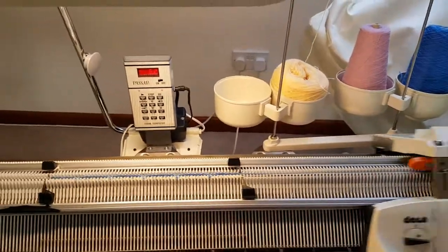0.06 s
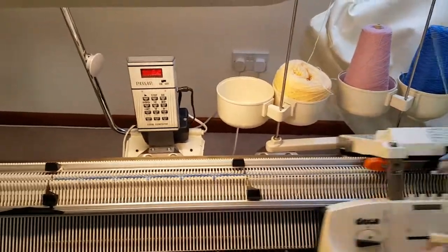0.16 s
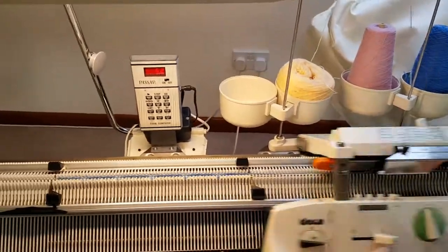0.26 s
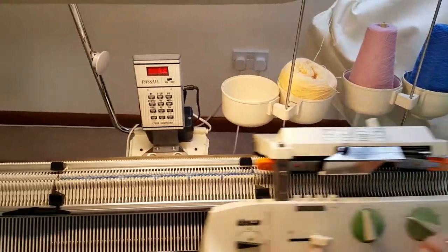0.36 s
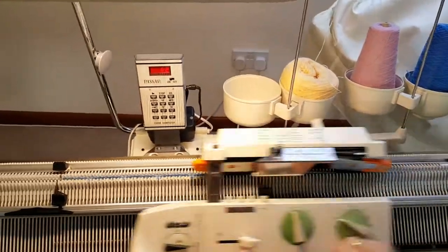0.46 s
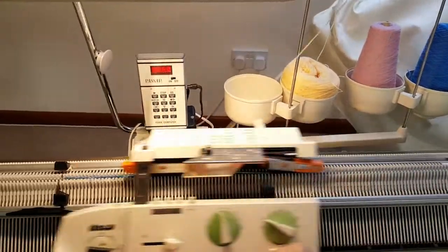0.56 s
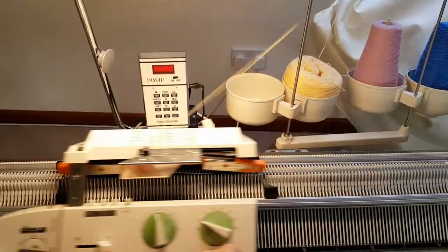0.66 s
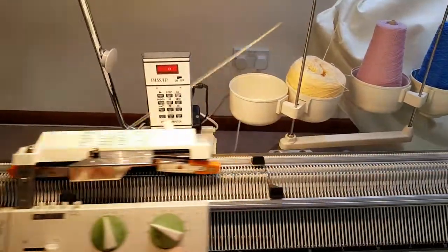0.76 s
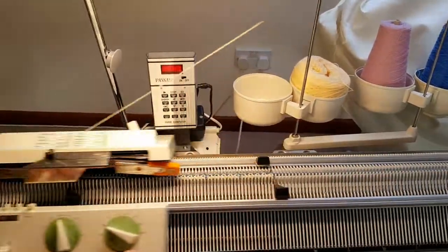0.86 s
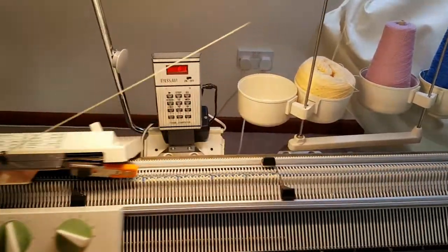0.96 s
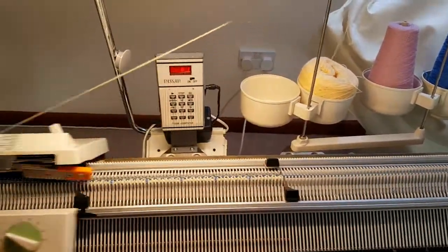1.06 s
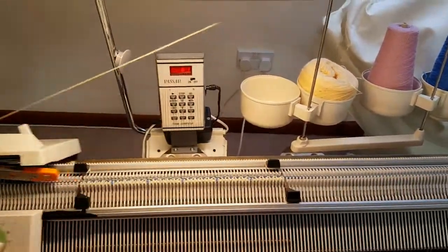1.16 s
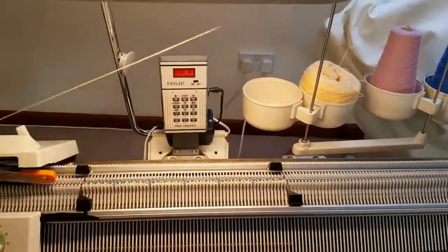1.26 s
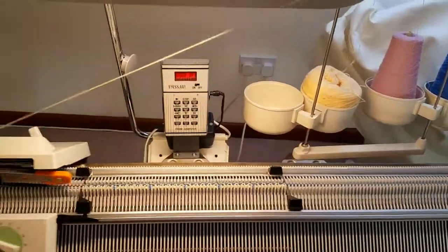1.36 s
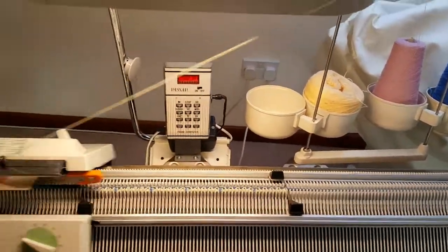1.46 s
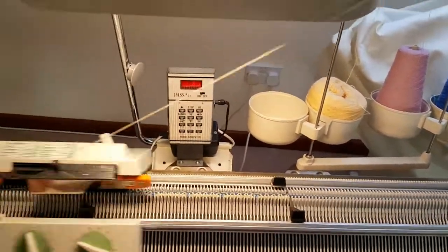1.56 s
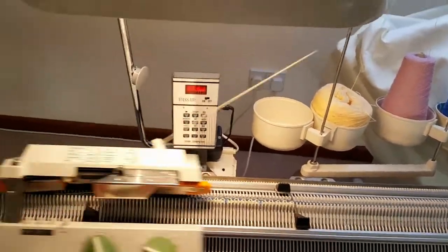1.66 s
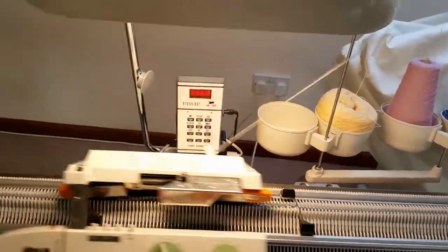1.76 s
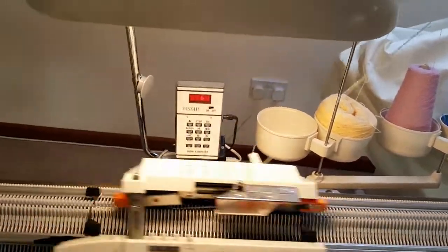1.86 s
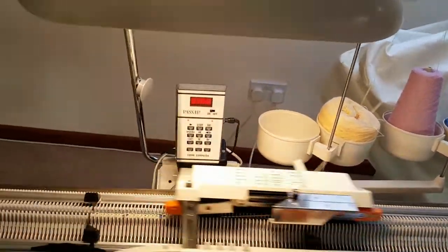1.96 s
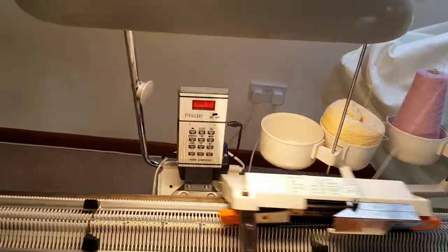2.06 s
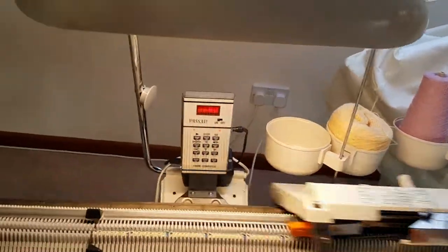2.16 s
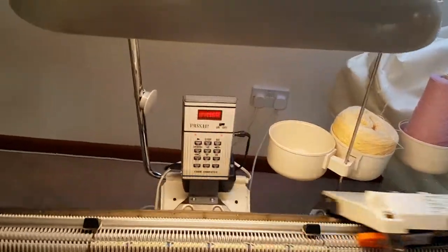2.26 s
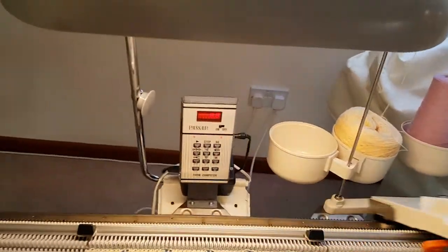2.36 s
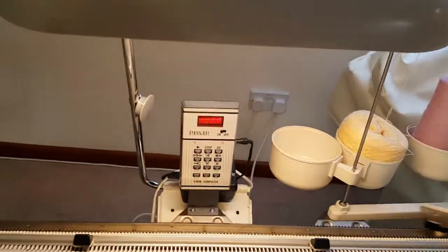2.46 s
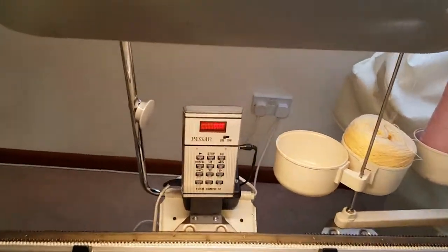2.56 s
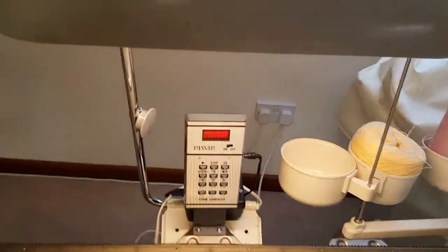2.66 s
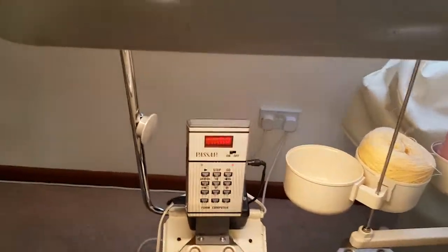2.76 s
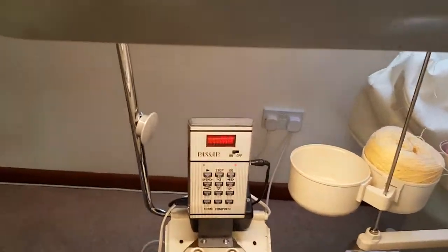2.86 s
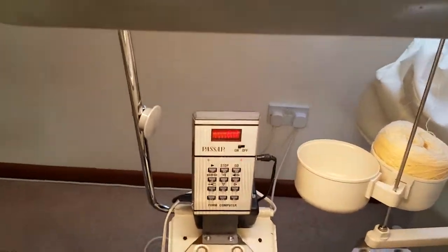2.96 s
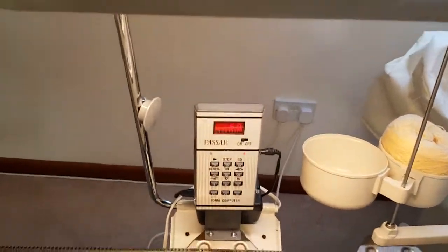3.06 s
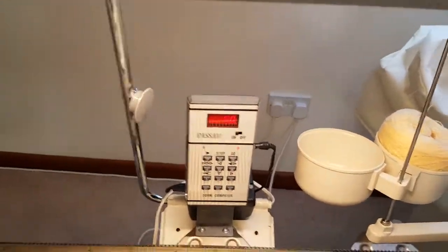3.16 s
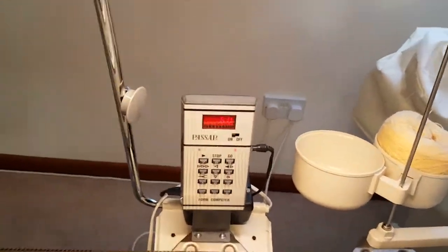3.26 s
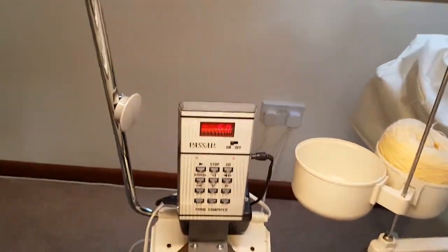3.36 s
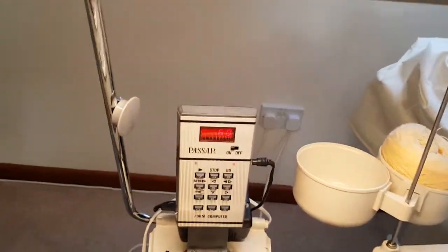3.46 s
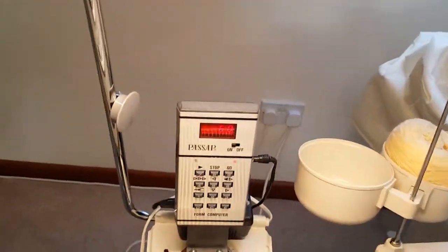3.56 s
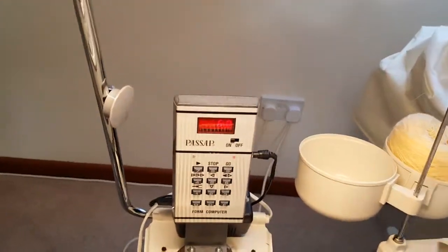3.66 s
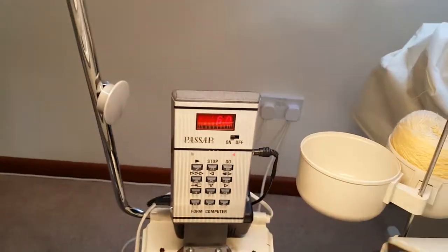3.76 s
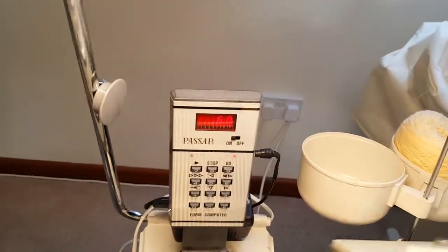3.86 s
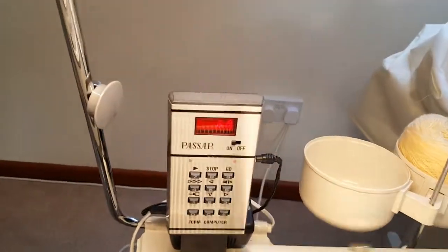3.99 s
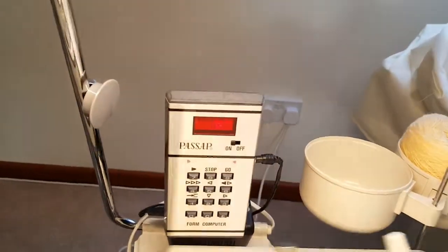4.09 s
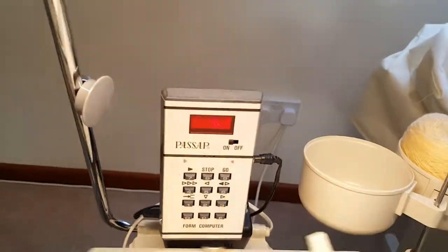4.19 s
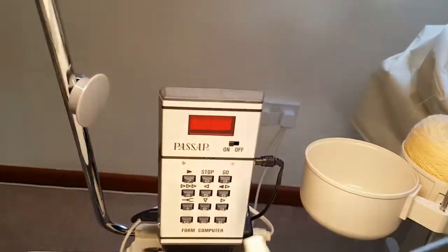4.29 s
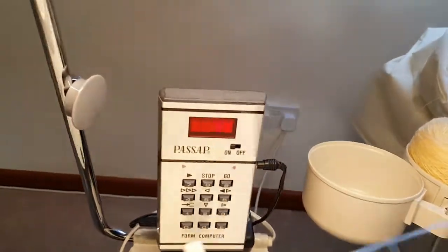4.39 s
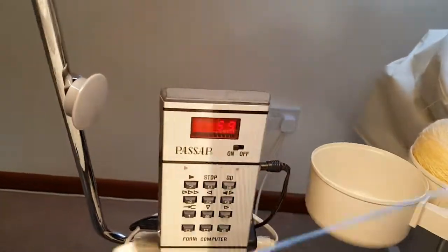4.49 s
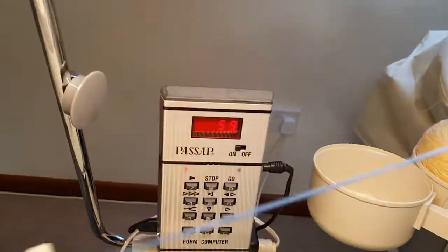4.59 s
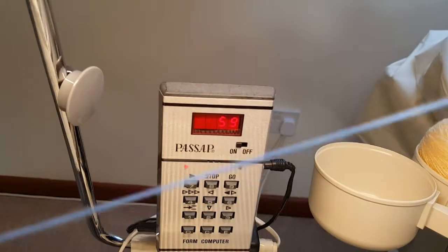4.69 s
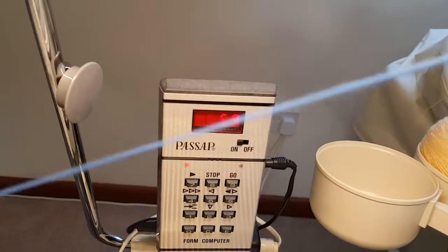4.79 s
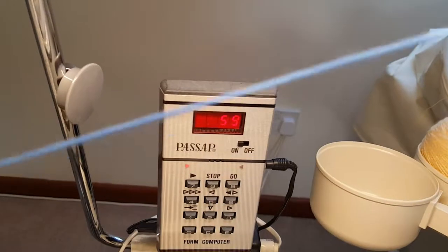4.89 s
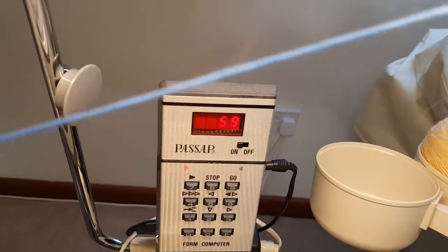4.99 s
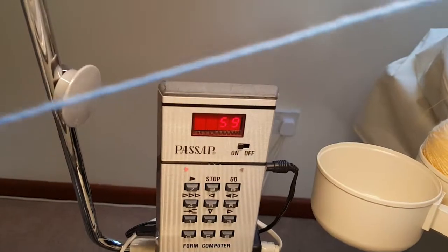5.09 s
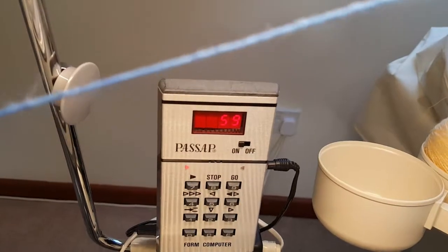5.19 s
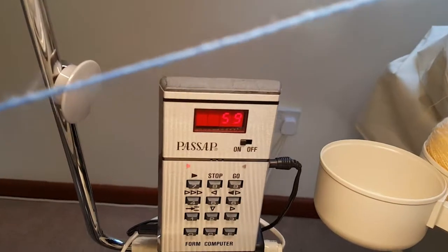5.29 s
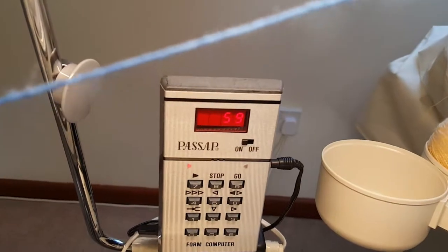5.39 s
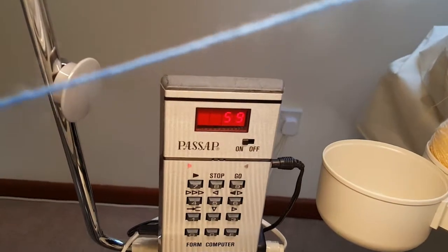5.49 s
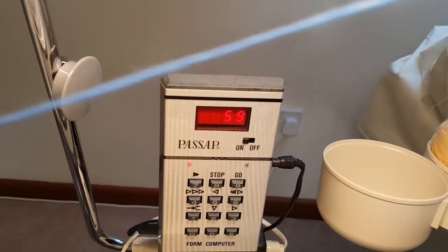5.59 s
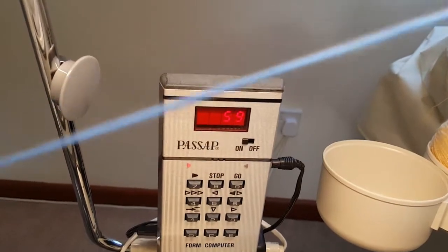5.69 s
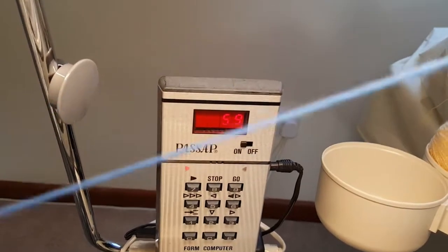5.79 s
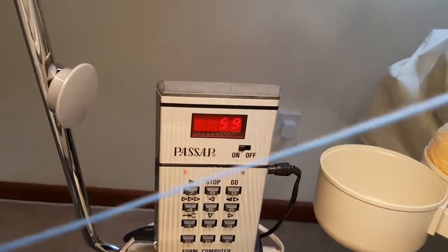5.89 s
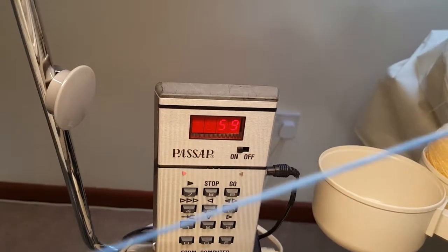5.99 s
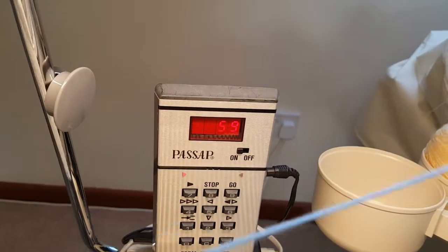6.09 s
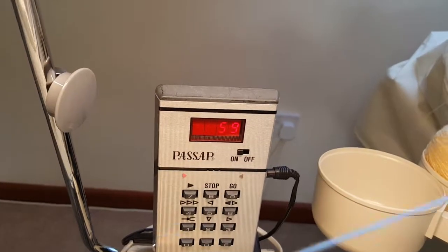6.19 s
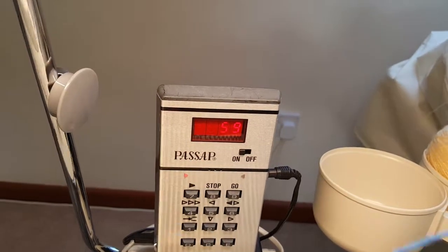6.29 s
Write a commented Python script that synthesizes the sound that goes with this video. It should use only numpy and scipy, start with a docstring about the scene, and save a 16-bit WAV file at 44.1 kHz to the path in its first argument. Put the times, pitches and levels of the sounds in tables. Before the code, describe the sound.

In a quiet indoor room, a hand knitting machine carriage starts with sharp clacks, then sweeps along its steel needle bed with a dense, buzzing rattle and hollow drone. It clunks at the end, sweeps back louder, pauses amid knocks and jerky shoves, makes a third pass, then settles with light clicks and faint squeaks. A close stereo microphone catches short room echoes.

```python
"""Knitting machine carriage, close by

A hand pushes a knitting machine carriage to and fro along its steel needle beds in a quiet room.
Needle ticks rattle the steel and like ticks at the same pace drone in the carriage shell; clacks
crack and chatter, bumps and knocks ring as short tones, and faint squeaks waver while it rests.
A small two-port microphone close by hears it all with short echoes, over the hush of the room."""
import sys
import numpy as np
from scipy import signal
from scipy.io import wavfile
from scipy.ndimage import uniform_filter1d

SR = 44100
rng = np.random.default_rng(int(sys.argv[2]) if len(sys.argv) > 2 else 0)


def store_pcm(level_fs):
    """Save levels as 16-bit WAV."""
    pcm = np.round(np.clip(level_fs, -1, 1) * 32767).astype(np.int16)
    wavfile.write(sys.argv[1], SR, np.atleast_2d(pcm).T)


N = 279594
T = np.arange(N) / SR


def gain_of(db):
    """Decibels to amplitude gain."""
    return 10 ** (np.asarray(db) / 20)


def evened(x):
    """Scales a signal to rms 1."""
    return x / np.sqrt(np.mean(x ** 2) + 1e-20)


def read(points, hz):
    """Reads a (pitch_hz, value) table along log frequency."""
    f, value = np.transpose(points)
    return np.interp(np.log(hz + 1), np.log(f + 1), value)


def coloured(x, shape, modes=()):
    """Minimum-phase filter of unit energy: a spectrum with resonance peaks on it."""
    hz = abs(np.fft.fftfreq(2 ** 13, 1 / SR))
    db = read(shape, hz)
    for mode_hz, width_hz, peak_db in modes:
        db = db + peak_db / (1 + (2 * (hz - mode_hz) / width_hz) ** 2)
    log_gain = np.log(gain_of(np.maximum(db, -90)))
    # the Hilbert transform of the log gain gives the phase that makes the filter causal
    taps = np.fft.ifft(np.exp(np.conj(signal.hilbert(log_gain)))).real[:2 ** 12]
    return signal.oaconvolve(x, taps / np.linalg.norm(taps))[:len(x)]


def tilted(x, bright_db, split_hz=6000):
    """Raises what lies above the split by bright_db."""
    low = signal.sosfilt(signal.butter(3, split_hz, "low", fs=SR, output="sos"), x)
    high = signal.sosfilt(signal.butter(3, split_hz, "high", fs=SR, output="sos"), x)
    return low + gain_of(bright_db) * high


def resonate(x, hz, width_hz):
    """A resonance of gain 1: shifts hz down to zero, smooths, and shifts back."""
    turn = np.exp(2j * np.pi * np.cumsum(hz * np.ones(len(x))) / SR)
    r = np.exp(-np.pi * width_hz / SR)
    smooth = signal.lfilter([1 - r], [1, -r], x / turn)
    return 2 * (turn * smooth).real


def drifting(x, spin, patchy_db, bins=5, frames=8):
    """Short-time spectra turned and shaded at random, as the paths change while things move."""
    z = signal.stft(x, nperseg=256, noverlap=192)[2]
    turn, shade = rng.standard_normal((2,) + z.shape)
    turn = evened(uniform_filter1d(uniform_filter1d(turn, size=2, axis=0), size=frames, axis=1))
    shade = evened(uniform_filter1d(uniform_filter1d(shade, size=bins, axis=0), size=5 * frames, axis=1))
    changed = z * np.exp(1j * spin * turn) * gain_of(patchy_db * shade)
    out = signal.istft(changed, nperseg=256, noverlap=192)[1][:N]
    return out * np.linalg.norm(x) / np.linalg.norm(out)


# where the carriage stands before the two ports: start_s, left_minus_right_db, left_lag_ms
PLACE = [(0, -6, 0.47), (.45, -5, 0.16), (1.25, -6, -0.08), (2.25, -5.5, 0.15), (2.6, -5.5, 0.3),
         (3.25, -6, 0.48), (4.15, -5, 0.19), (4.75, -3.5, 0.012), (5.75, -4.5, -0.16), (6.34, -3.5, -0.17)]
# how much louder the left port hears each pitch: pitch_hz, left_minus_right_db
LEAN = [(60, 2), (120, 5), (240, 2.5), (480, 4), (950, 3), (1890, 2.5), (3770, -1.5), (7520, 3.5),
        (15000, 5)]
# how far the left port leads in phase: pitch_hz, left_lead_rad
LEAD = [(10, 0), (60, .6), (860, .55), (1700, .5), (3500, 1.2), (6000, .2), (15000, 0)]
# scattered sound that differs between the ports: pitch_hz, level_db
SIDEWAYS = [(60, -10), (250, -9), (600, -12), (1200, -4.5), (2500, -2), (5000, -1), (9000, -4), (15000, -6)]


def ports(middle, scattered):
    """Two ports hear the source with unlike level and timing; scattered sound enters them opposed."""
    hz, t, (middle, scattered) = signal.stft([middle, scattered], SR, nperseg=512)
    start_s, pan_db, lag_ms = np.transpose(PLACE)
    lean = gain_of((read(LEAN, hz)[:, None] + np.interp(t, start_s, pan_db)) / 2)
    lagging_hz = hz * np.exp(-(hz / 3000) ** 2)  # the treble arrives by many paths
    lag = 2 * np.pi * np.outer(lagging_hz, np.interp(t, start_s, lag_ms) / 1000)
    lean = lean * np.exp(.5j * (read(LEAD, hz)[:, None] - lag))  # each port takes half the difference
    side = gain_of(read(SIDEWAYS, hz))[:, None] * scattered
    return signal.istft([(middle + side) * lean, (middle - side) / lean], SR, nperseg=512)[1][:, :N]


# spectrum of the quiet room: pitch_hz, relative_db (per Hz)
ROOM_SPECTRUM = [(12, -13.5), (20, -4), (206, -4), (332, -2), (393, -6.5), (1790, -14.5), (2370, -16),
                 (12800, -50)]


def room_hush():
    """Steady coloured noise, drawn apart for the shared and the scattered sound at the ports."""
    hush_db = -53
    noises = rng.standard_normal((2, N))
    return ports(*[gain_of(hush_db) * evened(coloured(v, ROOM_SPECTRUM)) for v in noises])


def ticks(needles_per_s, per_s, spread_db, t60_s, pulse, count=10):
    """Random ticks of uneven size, crowding where each needle meets the cam."""
    clear_needles_per_s = 90  # below this speed the needles lose their even beat
    phase = np.cumsum(needles_per_s) / SR % 1
    beat = np.clip(pulse * np.minimum(needles_per_s / clear_needles_per_s, 1) ** 2, 0, 1)
    crowd = 1 - beat * (1 - 4 * np.exp(-4 * phase))
    size = gain_of(spread_db * np.minimum(rng.exponential(1, N), 5))
    size = size * (rng.random(N) < per_s * crowd / SR)
    # every tick takes one of a few dying noise bursts
    kind, t = rng.integers(0, count, N), T[:1024]
    bursts = rng.standard_normal((count, len(t))) * gain_of(-60 * t / t60_s)
    return evened(sum(signal.oaconvolve(size * (kind == k), bursts[k])[:N] for k in range(count)))


# resonances of the carriage shell: pitch_hz, width_hz, level_db
SHELL_MODES = [(670, 45, -5), (346, 29, -14.5), (196, 37, -26), (1115, 24, -6.5), (1250, 49, -7),
               (1360, 310, 2), (495, 240, -12.5), (1660, 530, -1.5)]


def ringing(x):
    """The shell's modes, rung by x, each wandering slowly at random in strength and pitch."""
    wander_s, wander_db, wander_share = .18, 4, .012  # knot spacing, level and pitch spread
    knots = np.arange(0, len(x) / SR + wander_s, wander_s)
    t, out = np.arange(len(x)) / SR, np.zeros(len(x))
    for hz, width_hz, db in SHELL_MODES:
        swell, bend = rng.standard_normal((2, len(knots)))
        mode_hz = hz * (1 + wander_share * np.interp(t, knots, bend))
        gain = gain_of(db + wander_db * np.interp(t, knots, swell)) * np.sqrt(SR / width_hz)
        out += gain * resonate(x, mode_hz, width_hz)
    return out


# the three full passes over the needles, each a list of points: start_s, shell_drone_db,
# needle_rattle_db, drone_hz (centre), bright_db (rattle above 6 kHz), ring_db (shell modes)
PASSES = [
    [(.38, -45, -56, 990, 34, 7), (.415, -46.5, -40, 960, 10.5, 9), (.44, -21.5, -32.5, 1350, -3.5, -9),
     (.48, -26, -25, 1330, 2.5, -2.5), (.74, -24.5, -21.5, 1295, 3, -1), (.95, -25, -27, 1050, 3, 0.5),
     (1.11, -26.5, -31, 991.4, -6, -0.5), (1.23, -37.5, -34, 694, -1, 8.5), (1.27, -32, -42, 680, -14, -9),
     (1.45, -67, -65, 700, -3, -15)],
    [(1.66, -38.5, -37, 850, -0.5, 8), (1.73, -29.5, -23.5, 1100, 4.5, 6), (1.85, -26, -22, 1080, 3, 5),
     (1.92, -23.5, -20.5, 1260, 3, 2.5), (2.1, -20.5, -23, 1160, 1, -7.5),
     (2.28, -19.5, -26.5, 830, -3, 1.5), (2.37, -25.5, -23, 847, -0.5, 0.5),
     (2.42, -35.5, -34.5, 840, 1, 9.5), (2.46, -27, -49, 804, -14, 0)],
    [(3.99, -38.5, -39, 1230, -12, -4.5), (4.02, -27, -30.5, 1260, -0.5, 1),
     (4.22, -22.5, -20, 1090, 3.5, 0), (4.31, -18.5, -22, 1135, 2, -2.5),
     (4.5, -23.5, -29.5, 1160, -2, -1.5), (4.54, -27, -31.5, 1020, 1.5, -3.5),
     (4.75, -28.5, -36.5, 854, 0, -0.5), (4.92, -37, -38.5, 677, -9.5, 3),
     (5.0, -44.5, -46, 680, -5.5, -8.5), (5.1, -51, -62, 680, 0, 1.5)],
]
# short shoves and creeps of the carriage: start_s, length_s, shell_db, rattle_db,
# swell_db (over the length), drone_hz (centre), bright_db (rattle above 6 kHz), ring_db (shell modes)
SHOVES = [(-.03, 0.11, -25, -30, 2.5, 1200, -8, -7.5), (0.098, 0.11, -26, -32, -2.5, 890, -1, -4),
          (0.25, 0.082, -26, -29, -3, 1500, -3.5, -6), (1.445, 0.18, -54.5, -56, 23, 800, -4, -9.5),
          (2.447, 0.056, -21.5, -32, -2, 890, -2, -0.5), (2.578, 0.07, -28.5, -41.5, -8, 829, -4, -7),
          (2.687, 0.064, -35.5, -45, -2, 890, -3, -1), (2.795, .04, -30.5, -45, -3, 700, -6, -2.5),
          (2.871, .11, -30.5, -42, -4, 870, -5, 0), (3.008, 0.099, -23, -27.5, -2.5, 1080, -9, -37),
          (3.298, 0.075, -22.5, -24.5, -5, 1130, -11, -8.5), (3.4, 0.11, -25.5, -33, -2.5, 1200, -10, -0.5),
          (3.543, 0.19, -31.5, -31, 5, 990.3, -0.5, -3.5), (3.803, .15, -35, -40.5, 14, 1250, -4.5, -20),
          (5.077, 0.22, -46, -50, -15, 910, -2, -3.5), (5.58, 0.35, -56, -62, 7.5, 895, -9.5, -8.5),
          (5.899, 0.24, -44, -49.5, -5, 830, -7.5, -11), (6.122, 0.2, -49.5, -47, 18, 895, -9, 0)]


def motion():
    """Adds the power of all movements; drone pitch, brightness and ring are averaged over them, weighted by
    shell power."""
    rise_s, fall_db_per_s = .025, 260  # how a shove sets in and dies
    rest_shell_db, rest_rattle_db = -72, -63  # the hand never holds the carriage quite still
    moves = []
    for points in PASSES:
        s, shell_db, steel_db, *tone = np.transpose(points)
        on = (T >= s[0]) & (T < s[-1])
        levels = [on * gain_of(np.interp(T, s, db)) for db in (shell_db, steel_db)]
        moves.append(levels + [np.interp(T, s, c) for c in tone])
    for start_s, length_s, shell_db, steel_db, swell_db, *tone in SHOVES:
        u = T - start_s
        push_db = swell_db * np.clip(u / length_s, 0, 1) - fall_db_per_s * np.maximum(u - length_s, 0)
        push = np.clip(u / rise_s, 0, 1) * gain_of(push_db)
        levels = [push * gain_of(shell_db), push * gain_of(steel_db)]
        moves.append(levels + [np.full(N, c) for c in tone])
    shell, steel, *tone = np.transpose(moves, (1, 0, 2))
    share = shell ** 2 + 1e-12  # each movement's tone counts by its shell power
    shell_gain = np.linalg.norm(shell, axis=0) + gain_of(rest_shell_db)
    steel_gain = np.linalg.norm(steel, axis=0) + gain_of(rest_rattle_db)
    return shell_gain, steel_gain, *(share * tone).sum(axis=1) / share.sum(axis=0)


# spectrum of the carriage shell: pitch_hz, relative_db (per Hz)
SHELL_SPECTRUM = [(40, -50), (120, -12.5), (250, -15), (400, -4.5), (650, -4.5), (900, 0), (1400, -3),
                  (2000, -13), (3000, -31.5), (5000, -39.5)]
# the shell's strongest mode comes, goes and bends over time:
# start_s, pitch_hz, level_db (over the drone)
MAIN_MODE = [(.2, 875, -45), (.3, 856, 1), (.76, 878, 0), (.93, 813, -3.5), (1.0, 790, -37),
             (1.95, 860, -21), (2.0, 864, 4), (2.2, 860, -13.5), (2.4, 815, 2.5), (2.44, 870, -19.5),
             (4.18, 905, -25), (4.23, 863, -13.5), (4.5, 890, -7), (4.65, 890, -20)]
# spectrum of the steel needles and beds: pitch_hz, relative_db (per Hz)
STEEL_SPECTRUM = [(880, -38), (1500, -0.5), (2290, -1.5), (4830, -5), (5650, -6.5), (10600, -9.5),
                  (12400, -10), (15700, -8.5)]
# resonances standing out of that spectrum: pitch_hz, width_hz, level_db
STEEL_MODES = [(3020, 400, 3), (4800, 700, 3), (7650, 1200, 5), (9650, 600, 5), (12400, 2000, 5)]


def carriage():
    """Needle ticks ring the steel, and like ticks at the same pace drone in the shell."""
    shell_gain, steel_gain, drone_hz, bright_db, ring_db = motion()
    # a faster carriage rattles louder, so the needle rate is read from the rattle level
    creep_needles_per_s, top_needles_per_s, top_rattle_db = 35, 150, -21
    speed = (steel_gain / gain_of(top_rattle_db)) ** .6
    needles_per_s = creep_needles_per_s + (top_needles_per_s - creep_needles_per_s) * speed

    shake = ticks(needles_per_s, 5000, 1.0, 0.01, .4)
    shell = coloured(shake, SHELL_SPECTRUM)
    drone = evened(shell + 3.5 * resonate(shell, drone_hz, 790))
    shell = drone + gain_of(ring_db) * evened(ringing(shake))
    s, main_hz, main_db = np.transpose(MAIN_MODE)
    main = evened(resonate(shake, np.interp(T, s, main_hz), width_hz=30))
    shell = shell + gain_of(np.interp(T, s, main_db)) * main

    rattle = ticks(needles_per_s, 4500, 2, .009, .5)
    steel = tilted(coloured(rattle, STEEL_SPECTRUM, STEEL_MODES), bright_db)
    return drifting(shell_gain * shell + steel_gain * steel, spin=0, patchy_db=2.0)


# cams, latches and loose needles: start_s, level_db (burst), pitch_hz (ring),
# bright_db (above 6 kHz), t60_s (tail)
CLACKS = [(0.113, -37.5, 6500, 22, 0.048), (0.164, -16.5, 9150, 4, 0.05), (0.1722, -17.5, 6300, 2, 0.21),
          (0.2006, -16.5, 4970, 1, 0.38), (0.2446, -12.5, 1500, 5.5, 0.23), (0.2787, -19, 1710, -10, 0.18),
          (0.3087, -19, 2420, -10, 0.2), (0.444, -19, 7640, 3.5, 0.4), (0.497, -14.5, 2939, -12, 0.091),
          (1.1548, -14.5, 1450, 1, 0.11), (1.29, -30, 1500, -8, 0.11), (1.354, -28.5, 2720, -22, 0.16),
          (1.552, -39, 5070, 16.5, 0.13), (1.5747, -28, 7600, 4, 0.37), (1.5961, -15.5, 2560, 5, 0.14),
          (1.68, -38, 1800, -5, 0.084), (2.154, -16, 12500, 2, 0.036), (2.4468, -16.5, 3410, -1, 0.086),
          (2.459, -19, 4700, -15, 0.056), (2.5762, -33.5, 7700, 9, 0.3), (2.643, -48.5, 7450, 24.5, 0.12),
          (2.66, -25.5, 11400, 3.5, 0.08), (2.713, -43, 7450, 20.5, 0.27), (2.73, -31.5, 7400, 13, 0.036),
          (2.797, -30, 7530, 6.5, 0.28), (2.809, -24.5, 9300, 8.5, 0.034), (2.819, -25, 4830, 8, 0.094),
          (2.8777, -27, 9350, 9, 0.057), (2.884, -21.5, 4320, 6, 0.18), (2.993, -27, 3670, 1, 0.34),
          (3.019, -21.5, 4960, -1, 0.082), (3.04, -21, 4700, -7, 0.063), (3.054, -19, 4200, 3, 0.049),
          (3.085, -22.5, 4700, 2, 0.073), (3.309, -23.5, 1630, -3.5, 0.08), (3.3259, -18, 2110, -10, 0.21),
          (3.4138, -23.5, 1840, 8.5, 0.039), (3.477, -16.5, 9050, 7, 0.046), (3.4886, -16, 4260, 1.5, 0.2),
          (3.562, -30, 7600, 7.5, 0.49), (3.5806, -23, 4927, 11.5, 0.12), (3.6236, -12.5, 9450, 1.5, 0.18),
          (3.691, -23, 3367, 4, 0.064), (3.7, -21.5, 7600, 1, 0.05), (3.721, -25, 3960, 0, 0.018),
          (3.772, -22.5, 12400, -0.5, 0.03), (3.796, -26, 7600, 2.5, 0.17), (3.8598, -26.5, 1570, -5, 0.13),
          (3.9034, -18, 1690, -3.5, 0.03), (3.933, -17.5, 1430, -1.5, 0.13),
          (4.0865, -27.5, 9300, 10.5, 0.16), (4.3839, -15.5, 3530, -9, 0.069), (4.4, -7, 2980, -7.5, .11),
          (4.4354, -17, 1810, 3.5, 0.063), (4.5901, -18.5, 2670, -8, 0.054),
          (4.745, -35, 9100, 13.5, 0.081), (4.845, -22, 4430, 0, 0.13), (4.873, -33.5, 7600, 4, 0.054),
          (4.9499, -29, 1610, -3.5, 0.066), (5.0396, -31, 3190, -22, 0.052), (5.306, -52.5, 1760, 8, .048),
          (5.5423, -29.5, 2350, -31, 0.083), (5.55, -29, 2410, -25, 0.029), (5.694, -52.5, 2400, 14, 0.038),
          (5.737, -42, 1760, 3, 0.032), (5.77, -43, 5130, -12, .06), (5.7856, -33.5, 1100, -6, 0.18),
          (5.835, -34, 2360, 2, 0.14), (5.898, -36.5, 5000, 1.5, 0.16), (5.9572, -32.5, 2200, -7.5, 0.054),
          (6.0086, -38, 2380, -18.5, 0.084), (6.154, -31.5, 3400, -5, 0.086),
          (6.2271, -22, 4980, -1, 0.026), (6.2362, -22, 1630, -7, 0.15), (6.253, -29, 2400, -2, .04),
          (6.275, -27.5, 1980, -1.5, 0.029)]


def clacks():
    """Each clack is a sharp crack with a chattering tail, in the steel and in the shell."""
    crack_rise_s, crack_t60_s, tail_share, chatter_db = .0005, .014, .38, 3
    crisp_t60_s = .07  # clacks that drag on longer scrape more than they crack
    knock_db, knock_db_per_octave = -19, -7  # share that knocks in the shell, more for low parts
    steel, shell = np.zeros(N + SR), np.zeros(N + SR)
    t = T[:SR // 4]
    for start_s, db, hz, bright_db, t60_s in CLACKS:
        at, t60_s = round(start_s * SR), max(t60_s, .01)
        strike, knock, bounce = rng.standard_normal((3, len(t)))
        die = gain_of(-60 * t / t60_s)
        chatter = gain_of(chatter_db * evened(uniform_filter1d(bounce, size=130)))  # loose part bounces on
        crack = min(crisp_t60_s / t60_s, 1) * gain_of(-60 * t / crack_t60_s)
        fall = (crack + tail_share * chatter * die) * np.minimum(t / crack_rise_s, 1)
        burst = strike * fall
        part = burst + 1.65 * resonate(burst, hz, 0.1 * hz)  # the struck part has its own pitch
        steel[at:at + len(t)] += gain_of(db) * tilted(part, bright_db)
        shell_db = db + knock_db + knock_db_per_octave * np.log2(hz / 3000)
        shell[at:at + len(t)] += gain_of(shell_db) * knock * die
    steel = signal.lfilter(*signal.butter(1, 15000, fs=SR), steel)  # less of the highest treble
    steel = coloured(steel, STEEL_SPECTRUM, STEEL_MODES)
    return (steel + coloured(shell, SHELL_SPECTRUM) + 0.2 * ringing(shell))[:N]


# the carriage bumps the bed or a lever knocks: start_s, level_db (main tone), pitch_hz, t60_s
THUMPS = [(0.165, -21, 136, 0.027), (1.224, -19.5, 497, 0.059), (1.595, -27, 188, 0.071),
          (2.471, -11.5, 298, 0.064), (2.467, -11, 565, 0.022), (3.473, -10.5, 203, 0.015),
          (3.67, -20, 889, 0.15), (3.692, -30, 337, 0.053), (3.718, -19, 1310, 0.059),
          (3.857, -11.5, 1100, 0.019), (3.903, -14, 1150, 0.032), (4.397, -16.5, 388.9, 0.088),
          (4.59, -19, 893, 0.034), (4.948, -17, 690, 0.064), (5.042, -24.5, 1201, 0.033),
          (5.234, -34.5, 225, 0.053), (5.5517, -15, 2694, 0.012), (5.557, -24, 1746, 0.036),
          (5.677, -31, 954, 0.053), (5.733, -35, 643, 0.077), (5.958, -30, 2170, 0.037),
          (6.009, -31, 924.2, 0.053), (6.196, -26.5, 670, 0.047), (6.288, -23.5, 230, 0.052),
          (6.319, -25, 131, 0.033)]


def thumps():
    """Short rings that swell in a moment, with weaker overtones, an undertone and a broad puff."""
    out, t = np.zeros(N + SR), T[:SR // 3]
    for start_s, db, hz, t60_s in THUMPS:
        ring = np.zeros(len(t))
        for ratio, share in [(1, 1), (1.6, .2), (0.522, .28), (2.7, .14)]:
            ring += share * np.sin(2 * np.pi * ratio * hz * t)
        puff = resonate(resonate(rng.standard_normal(len(t)), 1.2 * hz, hz), 1.2 * hz, hz)
        ring = ring + .28 * evened(puff)
        rise = np.minimum(t * hz / 0.47, 1)  # about half a cycle
        out[round(start_s * SR):][:len(t)] += gain_of(db - 60 * t / t60_s) * ring * rise
    return out[:N]


# faint squeaks of the resting carriage: start_s, end_s, pitch_hz, width_hz, level_db
SQUEAKS = [(5.22, 5.72, 1770, 50, -59), (5.07, 5.28, 2760, 60, -54), (5.33, 5.73, 4100, 30, -63),
           (5.812, 5.9, 2400, 14, -41), (5.8, 5.93, 4950, 250, -55)]


def squeaks():
    """Thin wavering tones blurred by rubbing noise, swelling and fading."""
    out = np.zeros(N)
    for start_s, end_s, hz, width_hz, db in SQUEAKS:
        rub, waver = rng.standard_normal((2, N))
        band = evened(resonate(resonate(rub, hz, width_hz), hz, width_hz))
        tone_hz = hz + 0.66 * width_hz * evened(uniform_filter1d(waver, size=2500))
        tone = np.sin(2 * np.pi * np.cumsum(tone_hz) / SR)
        swell = np.sin(np.pi * np.clip((T - start_s) / (end_s - start_s), 0, 1)) ** .4
        out += gain_of(db) * (.25 * band + tone) * swell
    return out


def echoes(x, t60_s):
    """A dying spray of reflections: decaying noise taps of energy 1."""
    t = T[:SR // 2]
    taps = rng.standard_normal(len(t)) * gain_of(-60 * t / t60_s)
    return signal.oaconvolve(x, taps / np.linalg.norm(taps))[:N]


def scene():
    """The machine, placed as the carriage travels, with its echoes over the hush of the room."""
    machine = carriage() + clacks() + thumps()
    reflected = drifting(echoes(machine, t60_s=.2), spin=2.5, patchy_db=0)
    machine = machine + gain_of(-11) * reflected + squeaks()
    scattered = drifting(machine, spin=2.61, patchy_db=1.0)
    # the machine's sound is kept above the deep bass
    above_bass = signal.butter(2, 70, "high", fs=SR, output="sos")
    near = signal.sosfilt(above_bass, ports(machine, scattered))
    return near + room_hush()


def record(dry):
    """The recorder rounds off the highest peaks, then limits the band."""
    edge_hz = 15800
    soft = dry / (1 + (abs(dry) / 1.05) ** 4) ** .25
    low_pass = signal.firwin(511, edge_hz, window=("kaiser", 6), fs=SR)
    return signal.oaconvolve(soft, low_pass[None], "same")


dry = scene()
out = record(dry)
store_pcm(out)
```